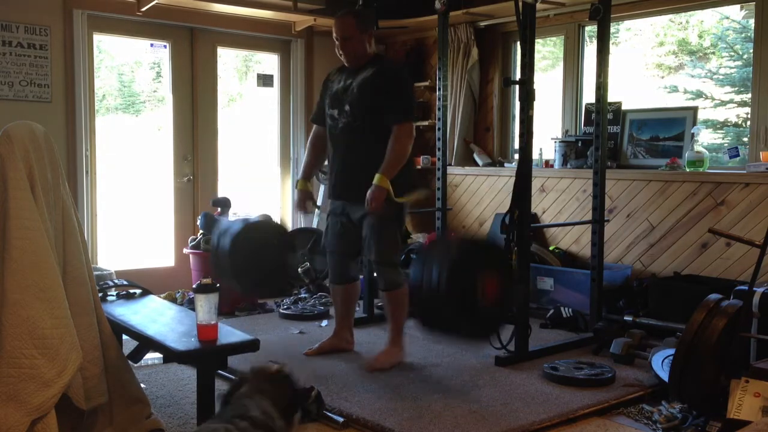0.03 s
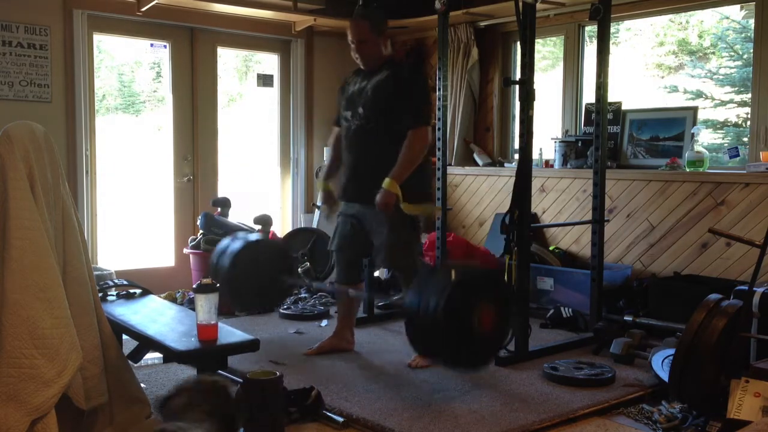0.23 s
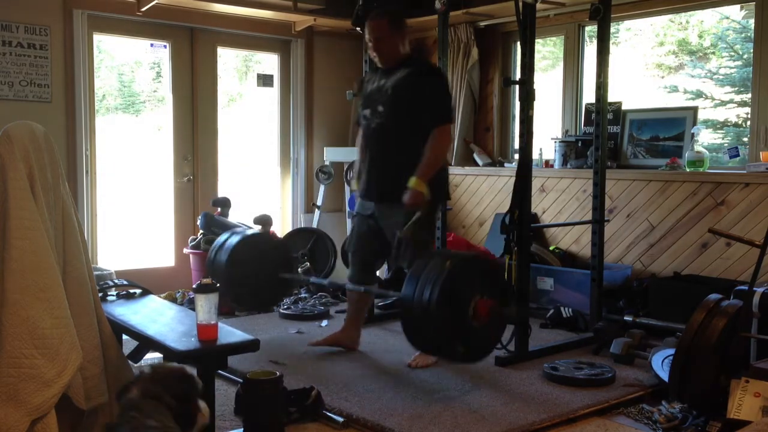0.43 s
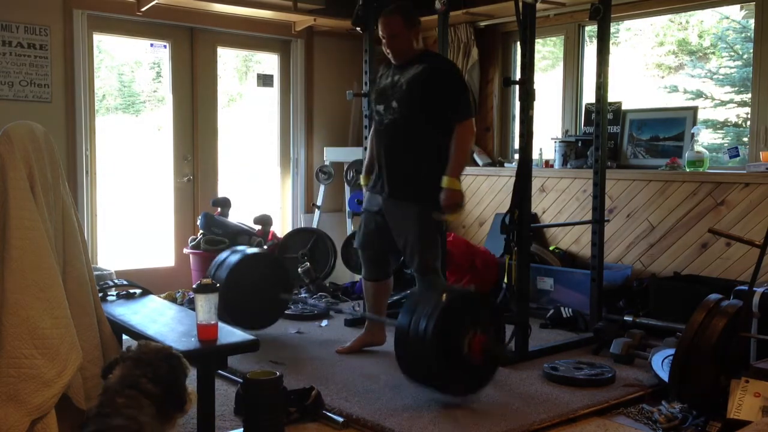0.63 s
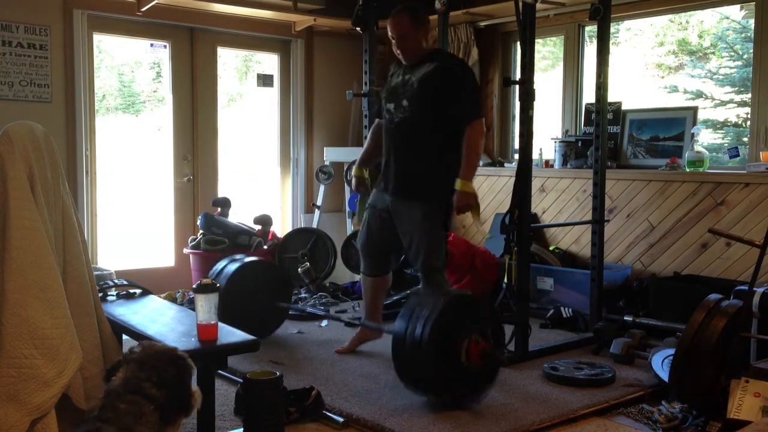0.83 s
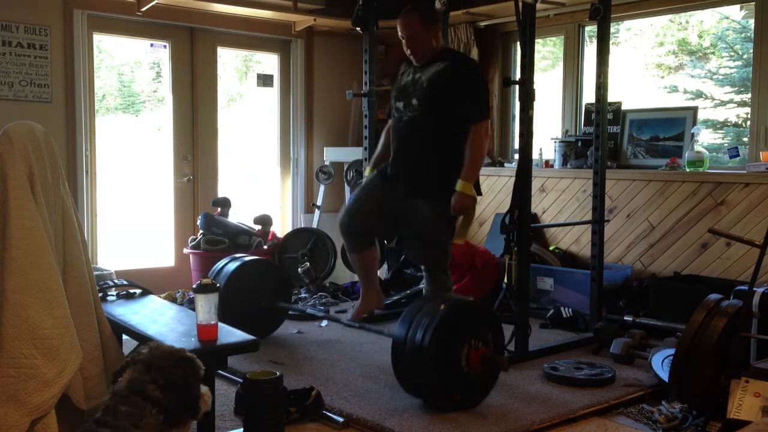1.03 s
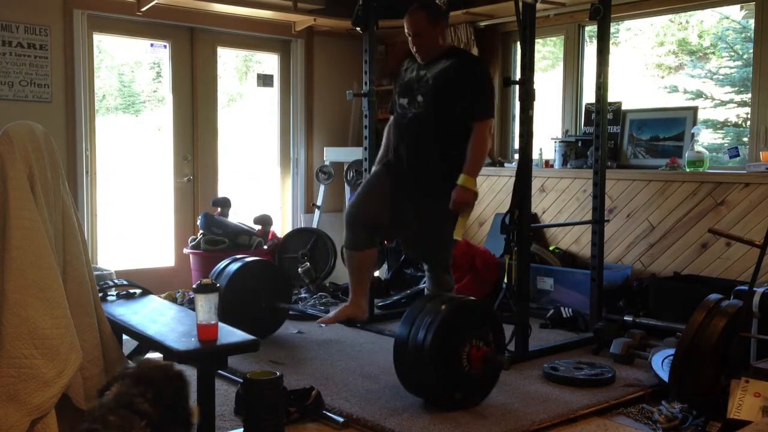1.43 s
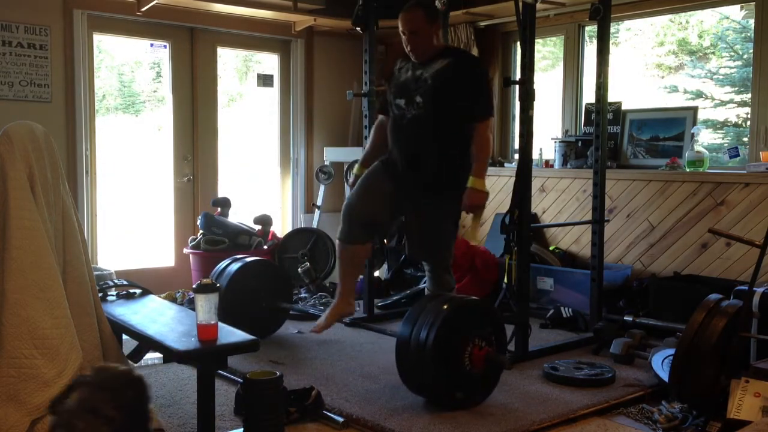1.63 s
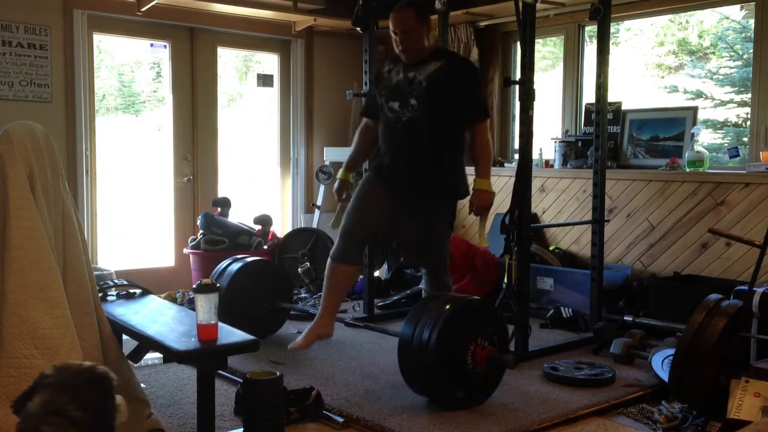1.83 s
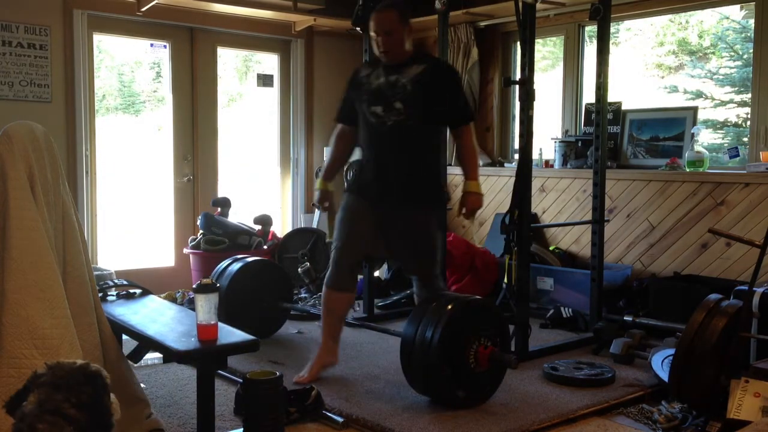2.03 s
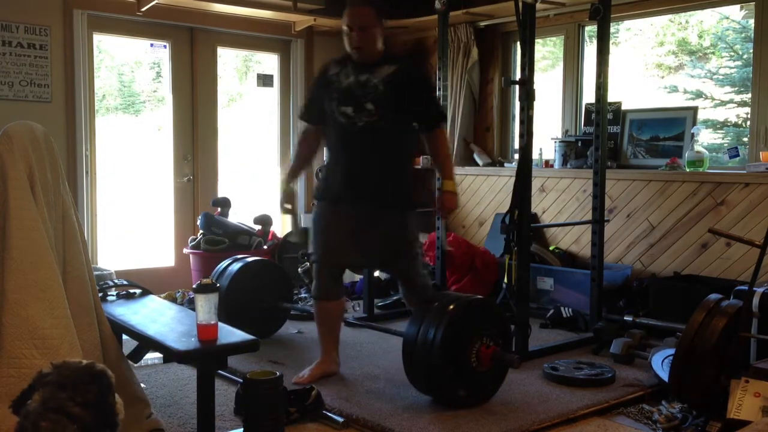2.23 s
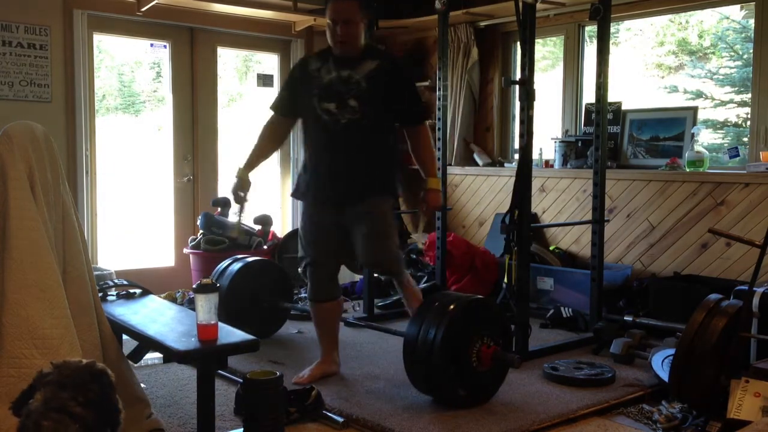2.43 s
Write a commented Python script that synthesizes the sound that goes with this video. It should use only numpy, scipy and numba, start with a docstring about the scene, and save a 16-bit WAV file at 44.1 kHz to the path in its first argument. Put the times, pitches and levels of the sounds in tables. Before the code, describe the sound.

A loaded barbell drops in a small room. After a light clink at the start, it lands with a loud thump and clanging plates at 0.2 seconds and again at 0.6. Quicker bounces rattle the plates from 0.9 to 1.3 seconds while the steel bar rings. It rocks softly around 1.5 seconds, and a quiet barefoot step follows at 2.1 over faint hiss and hum.

```python
"""A home gym: a loaded barbell drops on the carpet and bounces to rest, one end after the other.
Each landing thumps the floor and sets the loose iron plates chattering while the steel bar sings on.
The bar rocks a little, then a bare foot steps down. The room is small, with a faint hiss and hum,
and a limiter holds the loudest peaks."""
import sys
import numpy as np
from scipy import signal
from scipy.fft import rfft, irfft
from scipy.io import wavfile
from scipy.ndimage import uniform_filter1d
from numba import njit

SR = 44100
rng = np.random.default_rng(int(sys.argv[2]) if len(sys.argv) > 2 else 0)


def log_audio(samples):
    """Write samples as a 16-bit WAV file to the path given in sys.argv[1]."""
    # one column per channel
    frames = np.atleast_2d(samples).T
    # limit to full scale, then quantise
    limited = np.clip(frames, -1, 1)
    pcm = np.round(limited * 32767).astype(np.int16)
    wavfile.write(sys.argv[1], SR, pcm)


N = 110250
T = np.arange(N) / SR
HIT_T = T[:SR // 2]  # half a second for one hit to ring
TOP_HZ = 15300


def undb(db):
    return 10 ** (np.asarray(db) / 20)


def unit(x):
    """Scale to unit energy."""
    return x / np.sqrt(np.sum(x ** 2))


def fade(t60, t=T):
    """Exponential decay from 1."""
    return np.exp(-np.log(1000) * t / max(t60, 1e-3))


def curve(points, hz):
    """Read a table on a log-frequency axis."""
    freqs, values = np.array(points).T
    return np.interp(np.log(hz + 1), np.log(freqs), values)


def colour(x, points, size=2 ** 17):
    """Minimum-phase EQ through (frequency [Hz], gain [dB]) points."""
    cepstrum = irfft(curve(points, np.fft.rfftfreq(size, 1 / SR)) * np.log(10) / 20)
    cepstrum[1:size // 2] *= 2
    cepstrum[size // 2 + 1:] = 0
    return irfft(rfft(x, size) * np.exp(rfft(cepstrum)))[:N]


def through(x, response):
    return signal.fftconvolve(x, response)[:N]


def at(s, x):
    """Place a sound at a time."""
    return np.pad(x, (max(int(s * SR), 0), N))[:N]


def blows(table):
    """One impulse for each row's time and level."""
    return sum(at(s, undb([db])) for s, db, *_ in table)


def ring(modes, t=HIT_T, detune=0.):
    """Decaying sines, one for each mode, with random polarity."""
    chance = rng.standard_normal((len(modes), 2))
    return sum(np.sign(flip) * undb(db) * fade(t60, t) * np.sin(2 * np.pi * hz * (1 + detune * off) * t)
               for (hz, db, t60), (flip, off) in zip(modes, chance))


def waver(size=1400):
    """Random wobble with a spread of 1, smoothed over size samples."""
    x = uniform_filter1d(uniform_filter1d(rng.standard_normal(N), size), size // 2)
    return x / x.std()


def room_tone(hum_hz=240):
    """Faint hiss and an appliance's hum."""
    # hiss EQ (frequency [Hz], gain [dB])
    air_eq = [(18, -60.5), (30, -32), (163, -15.5), (240, -2), (267, -12), (426, -17.5), (472, -26.5),
              (524, -17.5), (1200, -27), (2990, -24.5), (15000, -29.5)]
    air = colour(rng.standard_normal(N), air_eq)
    return undb(-64.5) * air / air.std() + undb(-71) * np.sin(2 * np.pi * hum_hz * T)


def bar(sway_db=2):
    """The steel bar sings from one bounce until the next takes over; each tone wavers as the bar shakes."""
    # bounces that ring the bar (time [s], level [dB], t60 [s])
    bounces = [(0.0, -34, 3.36), (0.224, -27.5, 5.2), (0.62, -28, 6.3), (0.921, -33, 3.3),
               (1.218, -26.5, 0.67)]
    # bar modes (frequency [Hz], level [dB], share of the bounce's t60 [ratio])
    modes = [(482, -14, 0.13), (547, -11, 0.18), (931, -11, 0.19), (953, -7.5, 0.19), (1136, -2, 0.85),
             (1200, -14, 0.99), (1389, -14, 0.98), (2050, -28, .35), (2830, -15, .15), (3062, -10, 0.23),
             (3165, -7.5, .17), (3907, -12, 0.087), (4530, -15, 0.089), (5620, -20, .2), (8160, -25, .18)]
    ends = [row[0] for row in bounces[1:]] + [N / SR]
    attack = 1 - fade(0.018)
    out = np.zeros(N)
    for hz, level, share in modes:
        swell = sum(undb(db) * at(s, fade(share * t60) * attack) * fade(0.071, np.maximum(T - end, 0))
                    for (s, db, t60), end in zip(bounces, ends))
        depth = 0.95 * np.clip(1.25 - share, 0, 1)  # short-lived tones waver most
        gain = undb(level + sway_db * waver(size=7000))
        tremolo = 1 + depth * waver()
        out += gain * swell * tremolo * np.sin(2 * np.pi * hz * T + depth * waver())
    return out


def plate_clank(count=130, lesser_t60=0.33):
    """One iron plate's answer to a knock: main modes, many lesser ones and a short crack."""
    # main plate modes (frequency [Hz], level [dB], t60 [s])
    modes = [(505, -9, 0.42), (662, -17.5, 0.31), (967, -7.5, 0.85), (1026, 1.5, 0.15), (1856, -1.5, .3),
             (2097, -6, 0.085), (2416, -7.5, .22), (2677, -1.5, 0.1), (2974, 1.5, 0.66), (2975, -0.5, 0.12),
             (3210, 9.5, 0.11), (3464, -11, 0.067), (4004, -6.5, .25), (4000, -1, .25), (4204, -5.5, .25),
             (5196, -6.5, 0.1), (5700, -15.5, .3), (6528, -11, 0.2), (7100, -12.5, 0.21), (7522, -15, .3),
             (8140, -16, .3), (8450, -12, 0.22), (9100, -15.5, 0.2)]
    # colour of the lesser modes and the crack (frequency [Hz], gain [dB])
    iron_eq = [(60, -47), (160, -2), (320, -3), (600, -4.5), (1050, 0), (1550, 0.5), (2300, 1.5), (3200, 8),
               (4000, -2), (5500, -2.5), (7500, -13), (8900, -14), (10000, -9), (11200, -18.5),
               (12400, -20), (13700, -17), (15500, -29.5)]
    lesser_hz = 350 * (TOP_HZ / 350) ** ((np.arange(count) + rng.random(count)) / count)
    lesser = ring([(hz, curve(iron_eq, hz) + 10 * np.log10(hz), lesser_t60) for hz in lesser_hz])
    crack = colour(rng.standard_normal(N) * fade(0.0028), iron_eq)[:len(HIT_T)]
    main = ring(modes, detune=.005)
    return undb(1) * unit(main) + undb(0.5) * unit(lesser) + undb(2.5) * unit(crack)


def plate_chatter(count=4, contacts_per_s=500):
    """Each clash is a crack and a dying chatter; plates ring longer in the air than on the carpet."""
    # plates knocking together (time [s], level [dB], chatter length [s], first crack [relative dB],
    # brightness [dB/octave], damping t60 [s])
    clashes = [(0.001, -17.5, 0.0091, -10.5, -5.5, .9), (0.019, -20, 0.012, -13.5, -8.5, .9),
               (0.064, -29.5, 0.016, -12.5, -11, .9), (0.2225, 1.5, 0.016, -12, 0, 1.2),
               (0.242, -5, 0.012, -2, -0.5, 1.2), (0.6195, -0.5, 0.044, -6.5, 1.5, .8),
               (0.657, -22.5, 0.042, -7.5, -11, .8), (0.877, -7.5, 0.047, -18, -2, .6),
               (0.920, 1, 0.0043, 2.5, -3.5, .3), (0.928, -9, .035, -12, 2.5, .6),
               (0.966, -16, 0.065, -8, -6, .5), (1.045, -11, 0.053, -3.5, -2, .5),
               (1.095, -9.5, 0.0066, -20, 1, .4), (1.102, -2, 0.021, -5, -1.5, .4),
               (1.143, -9, 0.034, -10.5, 1.5, .35), (1.212, -8.5, 0.03, -29.5, -1, .3),
               (1.265, -24, 0.025, -17, -5.5, .25), (1.293, -19, 0.0079, -8, -6.5, 0.051)]
    clanks = [plate_clank() for _ in range(count)]
    octaves = np.log2(np.clip(np.fft.rfftfreq(SR, 1 / SR), 700, 12000) / 3000)
    n, lead = len(HIT_T), SR // 1000  # the lead leaves room for the brightness EQ's pre-ring
    out = np.zeros(N)
    for row, (s, db, length, first_db, bright, damp_t60) in enumerate(clashes):
        spectrum = 0
        for k, clank in enumerate(clanks):
            touch = rng.random(n) < contacts_per_s / SR
            force = undb(-np.clip(rng.standard_normal(n), -2, 2)) * rng.choice([-1, 1], n)
            chatter = touch * force * np.exp(-(HIT_T / length) ** 1.8)
            chatter[0] += 3 * undb(first_db) * (k == row % count)  # plates take turns to crack first
            damped = clank * fade(damp_t60, HIT_T)
            spectrum += rfft(np.roll(chatter, lead), SR) * rfft(damped, SR)
        clash = irfft(spectrum * undb(bright * octaves))[:3 * SR // 4]
        out += undb(db) * at(s - lead / SR, clash)
    return out


def floor_boom():
    """The floor's low ring under a blow."""
    # floor modes (frequency [Hz], level [dB], t60 [s])
    modes = [(116.6, -2.5, .26), (155.5, -5, 0.38), (197.4, 1.5, .18), (243, -5.5, 0.068), (279, -2, 0.2),
             (314, -7.5, 0.2)]
    return ring(modes)


def floor_thumps(boom, swing_hz=217):
    """Each landing thuds, swings the floor briefly and rings its modes."""
    # weight meeting the floor (time [s], level [dB], t60 of the swing [s])
    landings = [(0.02, -28, .04), (0.209, -13, 0.036), (0.2169, 8, 0.043), (0.242, -2, 0.077),
                (0.263, -13.5, 0.067), (0.612, -15, 0.019), (0.621, -6, 0.03), (0.634, 3, 0.043),
                (0.878, -11.5, 0.18), (0.922, -5, 0.04), (0.969, -8, 0.081), (1.102, -10, 0.094),
                (1.157, -14.5, 0.046), (1.214, -17, 0.18), (1.292, -23, 0.035)]
    # thud EQ (frequency [Hz], gain [dB])
    thud_eq = [(25, -31.5), (70, -34), (120, -12), (230, 0), (330, 1.5), (480, -12), (1000, -12.5),
               (2200, -21.5), (5000, -42)]
    tone = np.sin(2 * np.pi * swing_hz * HIT_T)
    swing = sum(undb(db) * at(s, unit(tone * fade(t60, HIT_T))) for s, db, t60 in landings)
    thud = unit(colour(rng.standard_normal(N) * fade(0.016), thud_eq))[:len(HIT_T)]
    return undb(11) * swing + through(blows(landings), undb(-22.5) * boom + undb(8) * thud)


def rocking(boom):
    """The settling bar rocks, with soft floor bumps and clinks."""
    # rocks of the bar (time [s], level [dB])
    rocks = [(1.452, 0), (1.474, 2), (1.528, 2), (1.556, -3.5), (1.59, -19)]
    # clink modes (frequency [Hz], level [dB], t60 [s])
    clink_modes = [(1043, -0.5, .2), (1150, -2, 0.11), (594, -5, 0.074), (2150, -15, .15),
                   (3200, -18, 0.25)]
    bump = undb(-49) * boom + undb(-53) * ring(clink_modes)
    envelope = (1 - fade(0.014, HIT_T)) * fade(0.24, HIT_T)
    return through(blows(rocks), bump * envelope)


def footstep(time_s=2.088, thump_hz=155):
    """A bare foot brushes the carpet and comes down with a soft, low thump."""
    # sole brushing the carpet (frequency [Hz], gain [dB])
    scuff_eq = [(100, -15), (350, 2), (550, 2.5), (800, -11.5), (3500, -13), (12000, -34)]
    scuff = colour(rng.standard_normal(N), scuff_eq)
    away = np.abs(T - time_s)
    thump = np.exp(-away / 0.0095) * np.sin(2 * np.pi * thump_hz * T)
    return undb(-43.5) * thump + undb(-61) * np.exp(-away / 0.069) * scuff / scuff.std()


def room(x, wet_db=-4.5, build_s=.002):
    """Dense, short reflections of a small room."""
    # reverb decay by band (frequency [Hz], t60 [s])
    decays = [(120, .22), (500, 0.34), (2000, 0.32), (5000, 0.27), (14000, 0.36)]
    noise, hz = rfft(rng.standard_normal(N)), np.fft.rfftfreq(N, 1 / SR)
    tail = np.zeros(N)
    for centre, t60 in decays:
        band = curve([(f, float(f == centre)) for f, _ in decays], hz)
        tail += irfft(noise * band, N) * fade(t60)
    return x + undb(wet_db) * through(x, unit(tail * (1 - np.exp(-T / build_s))))


def scene():
    """Mono mix: the hits go through the room; the bar's ring and the room tone stay dry."""
    chatter, boom = plate_chatter(), floor_boom()
    hits = chatter + floor_thumps(boom) + rocking(boom) + footstep()
    return (room(hits) + bar() + room_tone())[None]


@njit
def follow(x, release):
    """Peak follower: instant rise, exponential fall."""
    out, peak = np.empty(len(x)), 0.
    for i in range(len(x)):
        peak = max(abs(x[i]), peak * release)
        out[i] = peak
    return out


def record(dry, low_cut_hz=105, limit_db=-.5, release_s=.025):
    """A limiter holds the loudest peaks; the deep bass and the top are cut."""
    low_cut = signal.butter(3, low_cut_hz, "high", fs=SR, output="sos")
    high_cut = signal.ellip(8, .2, 70, TOP_HZ, fs=SR, output="sos")
    x = signal.sosfilt(low_cut, dry[0])
    peak = follow(x, np.exp(-1 / (release_s * SR)))
    gain = uniform_filter1d(np.minimum(1, undb(limit_db) / (peak + 1e-9)), size=64)
    return signal.sosfilt(high_cut, np.clip(x * gain, -1, 1))[None]


dry = scene()
out = record(dry)
log_audio(out)
```